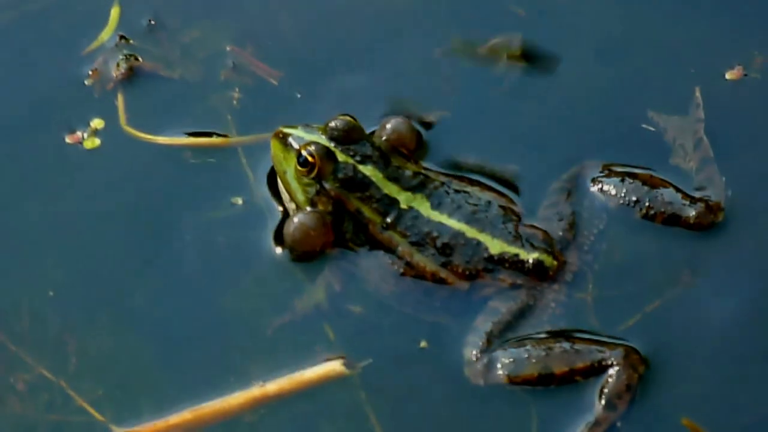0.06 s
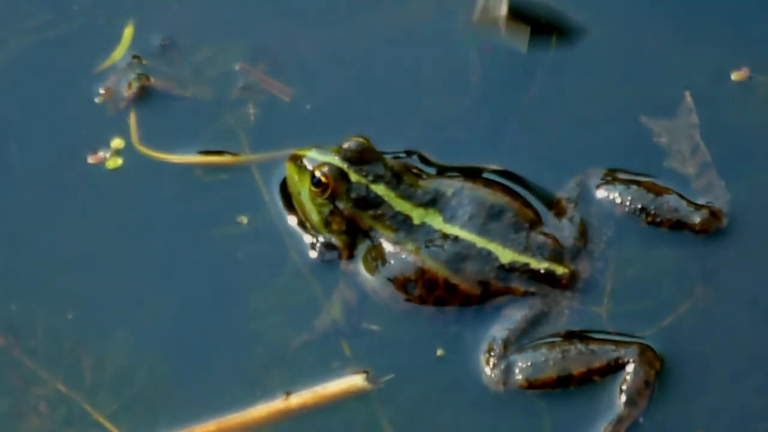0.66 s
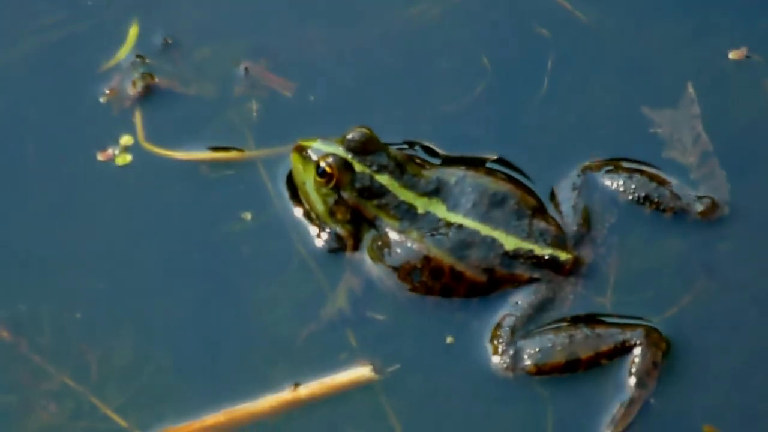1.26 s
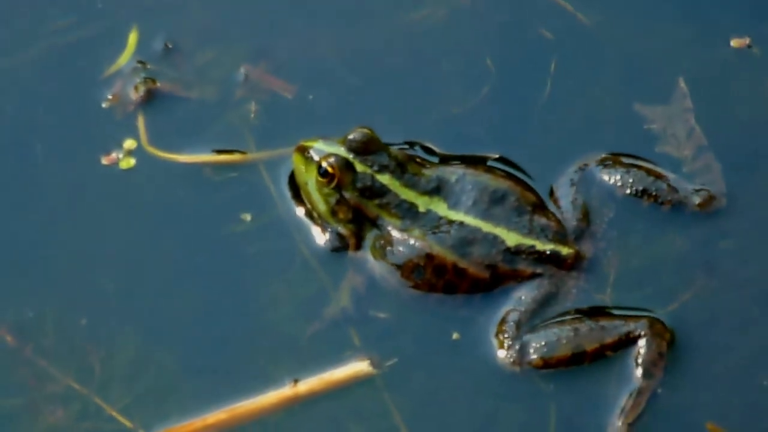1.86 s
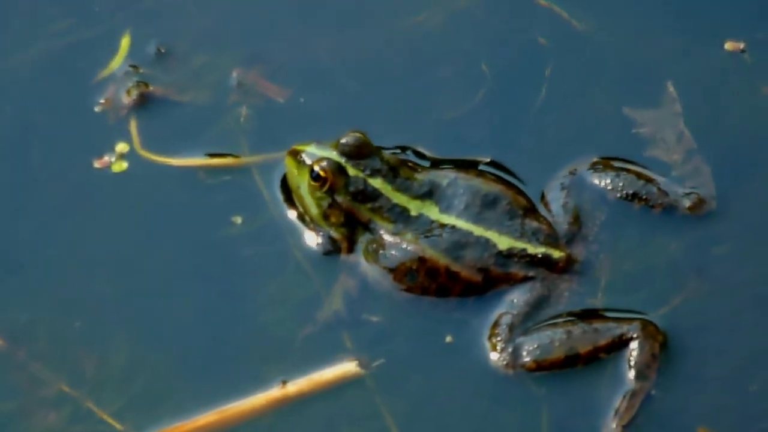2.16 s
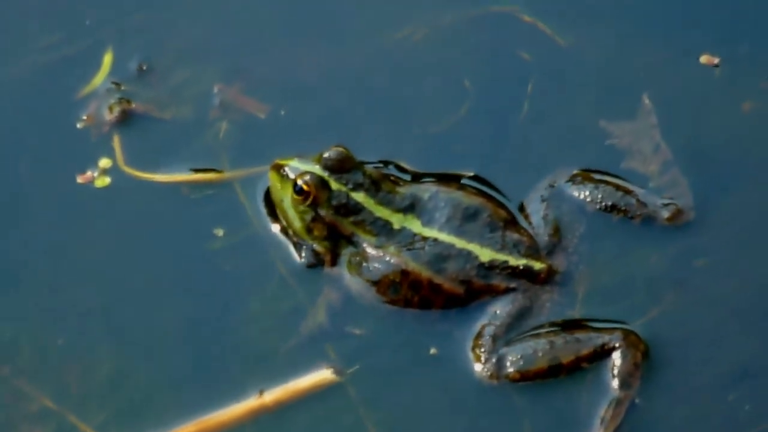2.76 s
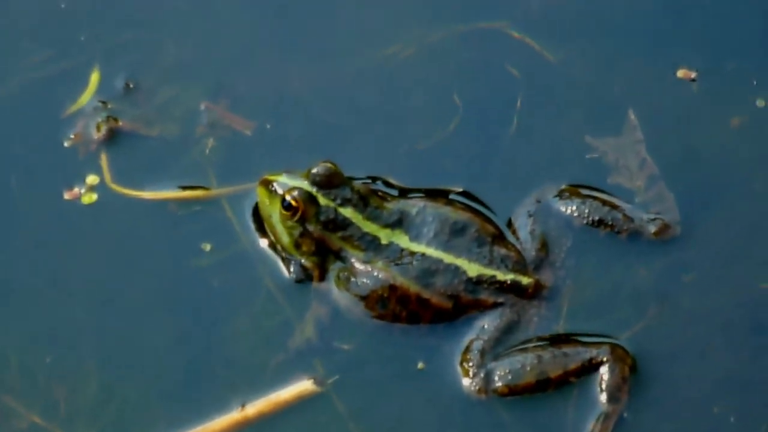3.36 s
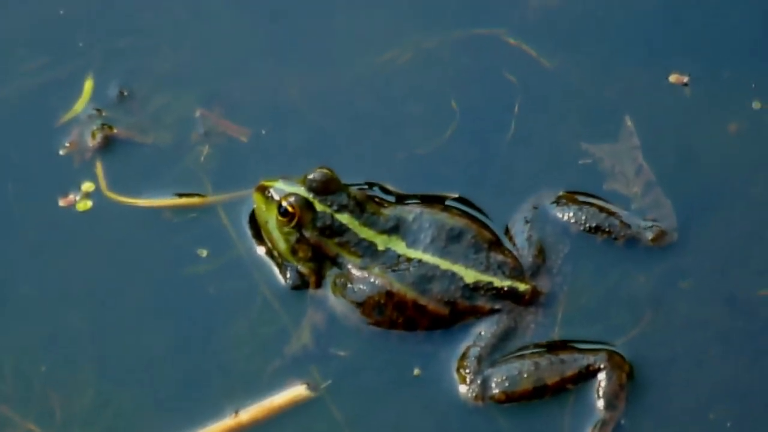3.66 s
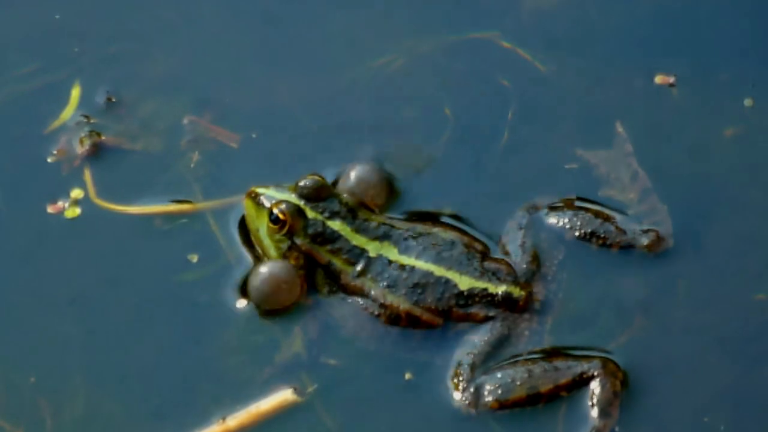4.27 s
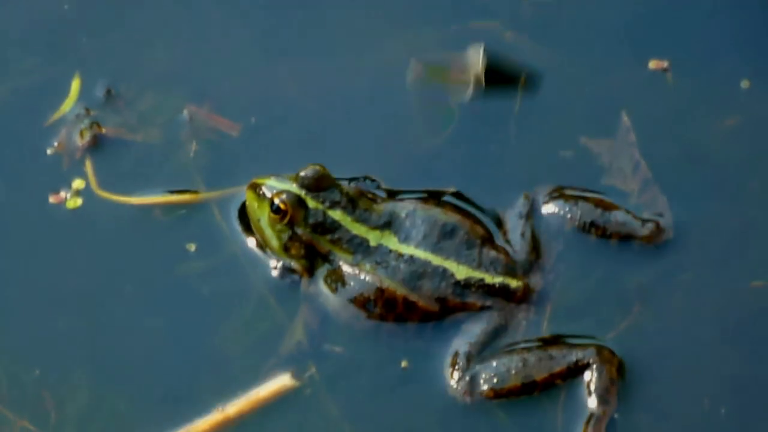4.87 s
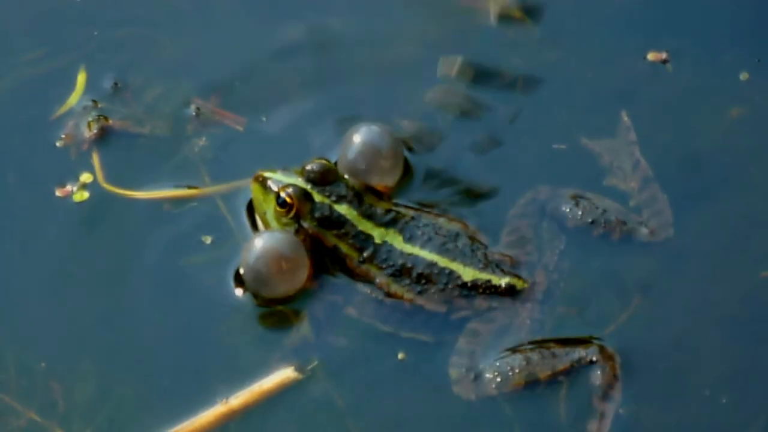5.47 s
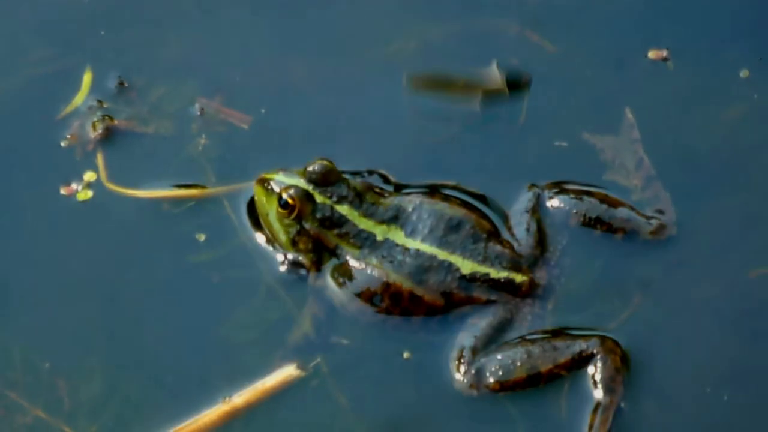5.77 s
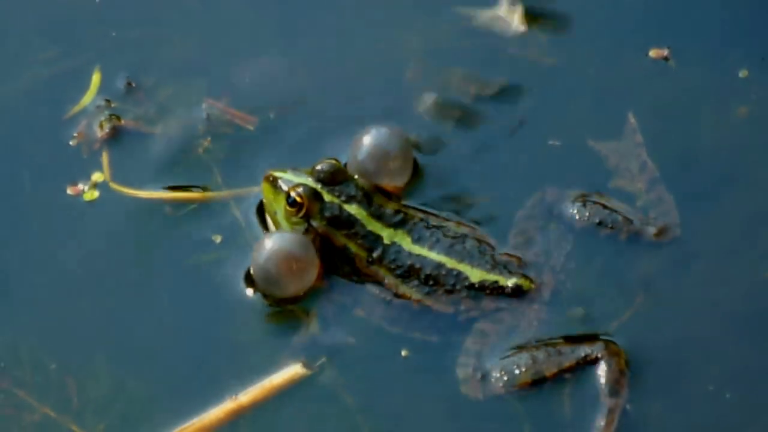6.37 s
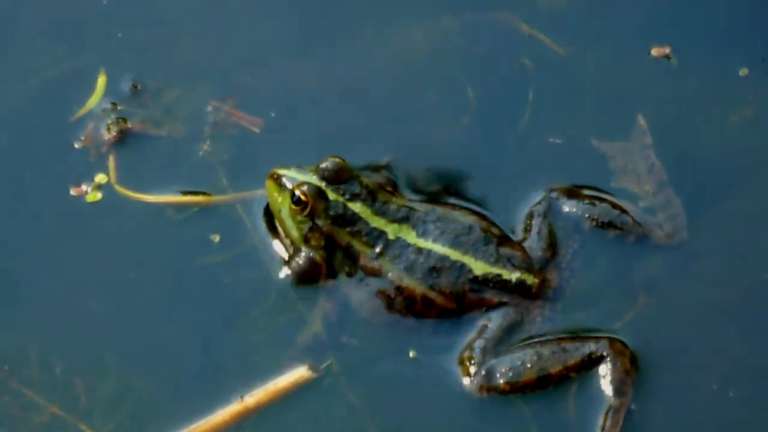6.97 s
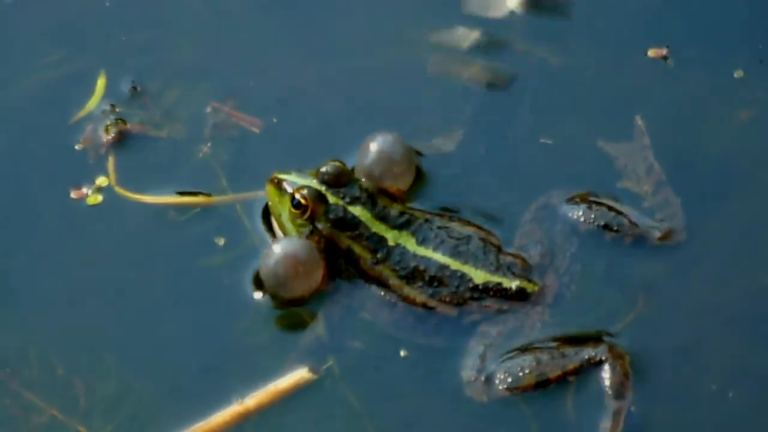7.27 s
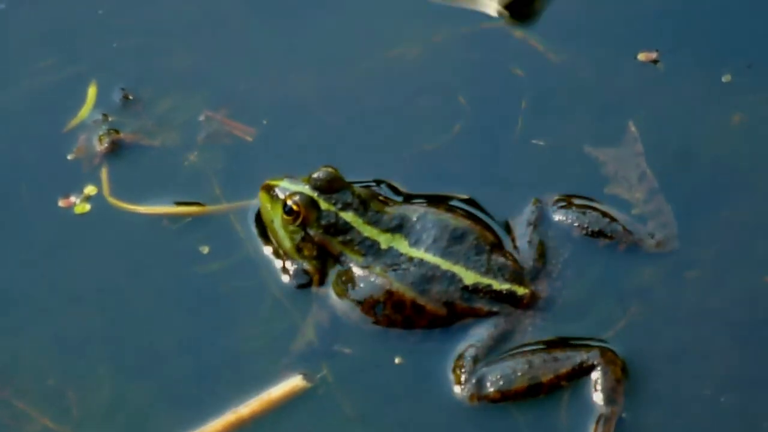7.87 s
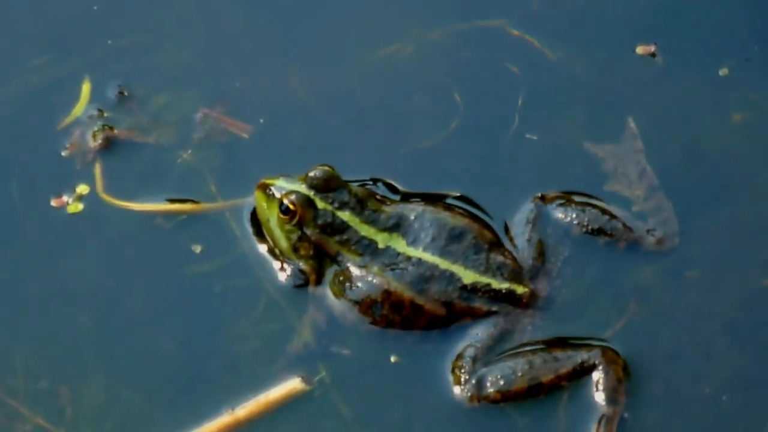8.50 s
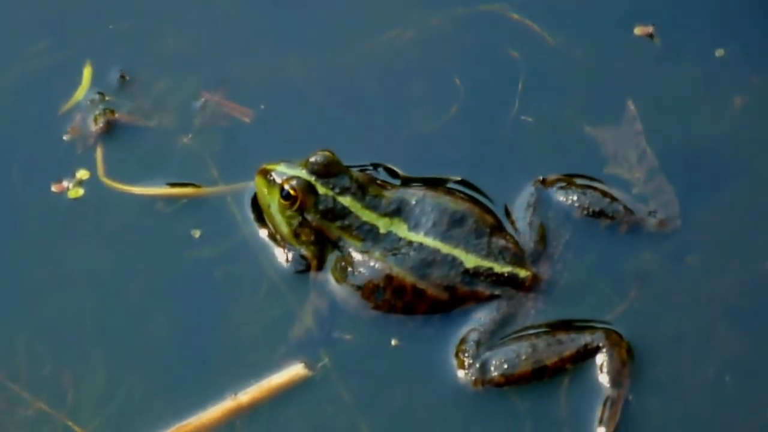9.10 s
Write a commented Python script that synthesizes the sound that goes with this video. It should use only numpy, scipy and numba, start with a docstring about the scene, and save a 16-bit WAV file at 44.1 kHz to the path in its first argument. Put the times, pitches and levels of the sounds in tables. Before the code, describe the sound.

Low grunts open a busy exchange of frog croaks at a pond. A clear frog and a raspy one take turns in fast pulsing bursts that rise and then droop, joined by softer distant frogs, rough grunting and a few low groans. A faint bird whistles once early and twice near the end. The calls are heard from nearby, leaning a little left, with light echoes and quiet open air behind.

```python
"""Water frogs call around a still pond: a clear-voiced one, a buzzy one to the left and a few further
off trade runs of ten notes a second that rise as the sacs fill and droop as the frog tires, some closing
on a slack groan; another grunts low in bouts. Each note is a train of larynx pulses ringing throat and
vocal sacs. The banks echo them, a bird slurs three whistles, and the air murmurs faintly."""
import sys
import numpy as np
from scipy import signal
from scipy.fft import rfft, irfft, next_fast_len
from scipy.io import wavfile
from scipy.ndimage import uniform_filter1d
from numba import njit

SR = 44100
rng = np.random.default_rng(int(sys.argv[2]) if len(sys.argv) > 2 else 0)


def master(y):
    """Save y as 16-bit WAV."""
    cut = np.clip(np.atleast_2d(y).T, -1, 1)
    pcm = np.round(cut * 32767)  # scale
    wavfile.write(sys.argv[1], SR, pcm.astype(np.int16))


N = 403074
SPAN = 8192  # samples in one note's buffer
T = np.arange(SPAN) / SR
F = np.fft.rfftfreq(SPAN, 1 / SR) + 1e-3

# Runs of notes: start_s, first_gap_s, notes, first_level_db, full_level_db, last_level_db,
# first_sac_hz, full_sac_hz, last_sac_hz, treble_vs_level_db
CLEAR_RUNS = [(.532, 0.095, 6, -21, -18.5, -24, 1456, 1993, 1800, -8.5),
              (2.027, .095, 5, -19, -18, -21, 1503, 1900, 1810, -9),
              (3.994, .0955, 5, -19, -17, -24, 1504, 1930, 1920, -8.5),
              (5.846, 0.095, 6, -21.5, -18, -27.5, 1496, 2004, 1800, -8),
              (7.258, .097, 6, -21, -19.5, -20, 1640, 2004, 2105, -9),
              (8.511, .0955, 7, -17.2, -17.3, -18.3, 1850, 2234, 2100, -10)]
BUZZY_RUNS = [(-.028, 0.059, 2, -21.5, -29.5, -29.5, 1800, 1800, 1690, -3),
              (.681, .0998, 7, -22.5, -23.5, -24, 1790, 2250, 2080, -1),
              (2.803, .1001, 7, -21, -21, -22.5, 1760, 1867, 1680, -5.5),
              (4.757, .1004, 6, -20.5, -21.5, -22, 1720, 1830, 1890, -5.5),
              (6.017, .1007, 7, -20.5, -23.5, -23, 2050, 2070, 1927, -2.5)]
FAR_RUNS = [(2.652, .102, 5, -26.5, -24, -26, 2076, 2130, 2070, -12),
            (5.504, 0.1, 4, -31, -24.5, -28.5, 2070, 1900, 1730, -17.5),
            (6.807, .095, 2, -47, -51, -47, 1690, 1850, 1930, -23),
            (8.053, 0.083, 4, -46, -43, -48.5, 1750, 1780, 1620, -12)]
# Slack groans: start_s, level_db, sac_hz, treble_vs_level_db
GROANS = [(1.362, -23, 1620, -9), (2.526, -25, 1720, -16), (3.474, -31, 1600, -17),
          (7.851, -24.5, 1760, -16)]
# Bouts of grunts: start_s, first_gap_s, grunts, length_s, nominal_pulse_hz, roughness (0-1), level_db,
# grunts_until_full, throat_hz, boom_db, treble_vs_level_db
GRUNT_BOUTS = [(0.038, .053, 6, .028, 95, .7, -31, 0, 1000, -29.5, -23),
               (1.668, 0, 1, .083, 390, .1, -32.5, 0, 1200, -43.5, -25),
               (1.76, 0, 1, .08, 385, .6, -33, -1.5, 760, -39, -18),
               (1.833, .035, 4, .042, 338.4, .65, -22.3, .9, 1000, -37.5, -28),
               (2.927, .11, 2, 0.075, 384, 0.65, -22, 2.2, 1075, -30.5, -28),
               (4.273, 0.049, 6, 0.033, 395, 0.53, -20, 2, 1435, -25.5, -11.5),
               (5.254, .0485, 5, 0.0314, 399.5, .55, -18.5, 2, 1390, -25.5, -8.5),
               (6.164, 0.05, 5, 0.029, 403.6, .65, -19, 2.5, 1425, -26, -12.5),
               (6.969, 0.041, 6, .038, 348, .85, -19.8, 3.5, 1150, -25, -17)]
# Body resonances, below the vocal sac's: centre_hz, width_hz, gain_db
CLEAR_BODY = [(400, 71, -20.5), (1000, 530, -14.5), (1420, 340, -11)]
BUZZY_BODY = [(403, 480, -26), (1026, 485, -12.5), (1204, 400, -10.5)]
FAR_BODY = [(530, 160, -20.5), (910, 240, -15)]
GROAN_BODY = [(416, 85, -13), (880, 250, -10), (1320, 260, -9)]
# Treble resonances that give each voice its edge: centre_hz, width_hz, gain_db
CLEAR_TREBLE = [(2664, 840, 2.5), (3258, 460, -3.5), (3874, 465, 4), (5100, 450, -9.5)]
BUZZY_TREBLE = [(2823, 200, 3.5), (3060, 440, 4.5), (4205, 400, 8), (5660, 490, -18.5)]
FAR_TREBLE = [(2750, 640, -1.6), (3300, 400, -1.1), (4730, 210, 1)]
GRUNT_TREBLE = [(2260, 340, -8), (3770, 420, -0.5)]
# The bird's slurs, one list of points per whistle: time_s, pitch_hz, level_db
WHISTLES = [
    [(1.675, 3470, -58), (1.69, 3270, -42), (1.715, 2980, -54), (1.745, 3340, -37), (1.77, 3680, -54),
     (1.815, 3700, -62.5), (1.838, 3370, -32), (1.86, 2990, -33), (1.915, 3060, -67.5)],
    [(7.07, 4880, -58), (7.085, 4860, -47), (7.125, 4580, -55), (7.17, 3970, -55)],
    [(8.01, 4240, -49), (8.032, 4730, -41.5), (8.075, 3310, -48), (8.1, 3410, -42), (8.13, 2990, -47),
     (8.16, 2400, -73)],
]
# Tone colour of the air bed: frequency_hz, relative_density_db
AIR_COLOUR = [(26, -64.5), (45, -37), (120, -20), (160, -20.5), (219, -8), (301, -9.5), (440, -2),
              (579, -3.5), (865, -10), (1160, -6.5), (1380, -10), (1700, -10), (2490, -14), (3410, -14),
              (4490, -16.5), (7000, -27.5), (9100, -63.5), (15400, -120)]
# Fader ride on the air's bass, taken about its mean: time_s, level_db
BASS_RIDE = [(0.0, -72), (1.39, -72), (1.75, -68.5), (4.91, -69), (6.54, -74), (7.12, -70), (9.1, -74.5)]

RISE_S, NOTE_S = .015, .04  # a croak's attack; the nominal length its level refers to


def clear_frog():
    """The lead voice: evenly timed pulses give a clean, pitched croak."""
    return croaks(run_notes(CLEAR_RUNS, slowing_s=.003, dull_db=4), CLEAR_BODY, CLEAR_TREBLE,
                  swell(RISE_S, .026, .024), start_hz=536.2, sag_s=.078, bend=1.6,
                  sac_width_hz=167, sac_sag=.32, jitter=.013, fray=2.46, bite_s=.066)


def buzzy_frog():
    """The answering voice: slower, more ragged pulses make it buzz."""
    return croaks(run_notes(BUZZY_RUNS, slowing_s=0, dull_db=8.1), BUZZY_BODY, BUZZY_TREBLE,
                  swell(RISE_S, .013, .022), start_hz=447, sag_s=.07, bend=1.4,
                  sac_width_hz=151, sac_sag=2.4, jitter=.03, fray=.7, bite_s=.15)


def far_frogs():
    """Softer, duller voices further off: each push of air holds, then stops short."""
    return croaks(run_notes(FAR_RUNS, slowing_s=.003, dull_db=1.5), FAR_BODY, FAR_TREBLE,
                  swell(RISE_S, .037, .01), start_hz=500.6, sag_s=.089, bend=1.4,
                  sac_width_hz=162, sac_sag=.61, jitter=.013, fray=2.7, bite_s=.11)


def groans():
    """Low, slack notes that close some runs, their pulse rate sagging only gently."""
    return croaks(GROANS, GROAN_BODY, CLEAR_TREBLE,
                  swell(RISE_S, .026, .028), start_hz=440, sag_s=.22, bend=1.3,
                  sac_width_hz=170, sac_sag=1.2, jitter=.03, fray=1.5, bite_s=.1)


def run_notes(runs, slowing_s, dull_db, fill_notes=.94, tire_power=3.5):
    """Phrasing of a run: notes rise and brighten as the sacs fill, then droop as the frog tires."""
    for start_s, gap_s, count, first_db, full_db, last_db, first_hz, full_hz, last_hz, treble_db in runs:
        count = round(count)
        for k in range(count):
            empty = np.exp(-k / fill_notes)
            tired = (k / (count - 1)) ** tire_power
            yield (start_s + k * gap_s + slowing_s * k * (k - 1) / 2,
                   full_db + (last_db - full_db) * tired if k else first_db,
                   full_hz + (first_hz - full_hz) * empty + (last_hz - full_hz) * tired,
                   treble_db - dull_db * empty)


def croaks(notes, body_modes, treble_modes, push, start_hz, sag_s, bend,
           sac_width_hz, sac_sag, jitter, fray, bite_s):
    """Pulses ring sacs and throat; their rate holds, then drops and frays as the pressure runs out."""
    out = np.zeros(N)
    spent_s = np.minimum(T, .055)  # the sag bottoms out here
    for start_s, level_db, sac_hz, treble_db in notes:
        onset_hz = start_hz * (1 + .02 * rng.standard_normal())
        pulse_hz = onset_hz * np.exp(-(spent_s / sag_s) ** bend * rng.uniform(.75, 1.25))
        force = undb((treble_db + 11) * .7)  # brighter notes are rougher
        pulses = larynx(pulse_hz, push, jitter * force, shimmer_db=1.5, rasp=.1 * force, fray=fray)
        sac = vocal_sac(pulses, sac_hz * np.exp(-sac_sag * (spent_s - .028)), float(sac_width_hz))
        taut_db = .012 * max(sac_hz - 1900, 0)  # on taut sacs the lower resonances recede
        body = ring(pulses, body_modes) * undb(-taut_db) - sac
        body = cut(cut(body, 2597, "low", order=7), 340, "high", order=4)
        stretch = 1 + .012 * rng.standard_normal()  # the throat is never held quite the same
        throat_modes = [(stretch * hz, width_hz, db) for hz, width_hz, db in treble_modes]
        bite = pulses * np.exp(-T / bite_s)  # the treble leans on the attack
        treble = cut(ring(bite, throat_modes, order=2), 5670, "low", order=4)
        add(out, start_s, level(body, level_db, NOTE_S) + level(treble, level_db + treble_db, NOTE_S))
    return out


def swell(rise_s, hold_s, fall_s):
    """The push of air: it builds, holds, then dies away."""
    attack = np.sin(np.pi / 2 * np.minimum(T / rise_s, 1)) ** 2
    return attack * np.exp(-(np.maximum(T - hold_s, 0) / fall_s) ** 2)


def larynx(hz, push, jitter, shimmer_db, rasp, fray=0):
    """One pulse and a puff of turbulent air per cycle, the pulses uneven in time and size."""
    cycles = np.cumsum(hz) / SR
    index = np.arange(64)
    chance = rng.standard_normal((64, 2))
    late = np.minimum(np.interp(index, cycles, T) / NOTE_S, 1)
    slip_cycles = jitter * (1 + fray * late ** 2) * chance[:, 0]  # fray loosens the note's tail
    pulse_s = np.interp(index + .3135 + slip_cycles, cycles, T)
    size = np.interp(pulse_s, T, push) * undb(shimmer_db * chance[:, 1])
    taps = (pulse_s * SR).astype(int)[:, None] + np.arange(-4, 5)
    clicks = size[:, None] * np.sinc(taps - pulse_s[:, None] * SR)  # placed between samples
    pulses = np.zeros(SPAN)
    np.add.at(pulses, np.clip(taps, 0, SPAN - 1), clicks)
    breath = rng.standard_normal(SPAN) * push * np.exp(-((cycles - .3) % 1) / .57)
    return pulses / np.std(pulses) + rasp * breath / np.std(breath)


@njit
def vocal_sac(x, hz, width_hz):
    """The sac's ring: a band-pass whose centre glides from sample to sample."""
    out, band_state, low_state = np.empty(len(x)), 0., 0.
    for i in range(len(x)):
        tuning, damping = np.tan(np.pi * hz[i] / SR), width_hz / hz[i]
        band = (band_state + tuning * (x[i] - low_state)) / (1 + tuning * (tuning + damping))
        band_state = 2 * band - band_state
        low_state += 2 * tuning * band
        out[i] = damping * band
    return out


def ring(x, modes, order=1):
    """Fixed resonances: order 1 alternates signs for shallow valleys, order 2 has steep skirts."""
    response = sum((-1) ** (k * order) * undb(db) / (1 + 1j * (F * F - hz * hz) / (F * width)) ** order
                   for k, (hz, width, db) in enumerate(modes))
    return irfft(rfft(x) * response)


def grunting_frog():
    """Slack pulses, uneven in time and size, boom in the swollen sacs and ring the throat."""
    out = np.zeros(N)
    for start_s, length_s, rate_hz, rough, throat_db, throat_hz, boom_db, treble_db in grunt_notes():
        droop = .9 + .22 * np.exp(-2 * T / length_s)
        pulse_hz = rate_hz * droop * (1 + .06 * rough * rng.standard_normal())
        push = swell(.14 * length_s, .54 * length_s, .54 * length_s)
        pulses = larynx(pulse_hz, push, jitter=.2105 * rough, shimmer_db=4.6 * rough, rasp=.4 * rough)
        modes = [(.56 * throat_hz, 240, -9), (.921 * throat_hz, 230, 0), (1.049 * throat_hz, 300, -4)]
        throat = ring(pulses, modes, order=2)
        boom = cut(ring(pulses, [(397.6, 147, 0)], order=2), 370, "high", order=4)
        treble = cut(ring(pulses, GRUNT_TREBLE, order=2), 5200, "low", order=4)
        add(out, start_s, level(throat, throat_db, length_s) + level(boom, boom_db, length_s)
            + level(treble, throat_db + treble_db, length_s))
    return out


def grunt_notes(slowing_s=.005):
    """Phrasing of a bout: slack sacs open on a soft boom, then the grunts harden and slow."""
    for (start_s, gap_s, count, length_s, rate_hz, rough, level_db,
         until_full, throat_hz, boom_db, treble_db) in GRUNT_BOUTS:
        for k in range(round(count)):
            slack = max(until_full - k, 0) ** 2  # longer, smoother, softer and lower
            spent_db = 3 * max(k - 4, 0)  # the air runs short after five grunts
            yield (start_s + k * gap_s + slowing_s * k * (k - 1) / 2,
                   length_s * (1 + .051 * slack), rate_hz, rough * np.exp(-.07 * slack),
                   level_db - 2.7 * slack - spent_db, throat_hz * np.exp(-.037 * slack),
                   boom_db - .7 * slack - spent_db, treble_db)


def bird():
    """Slurred whistles: a pure tone that glides and wavers slightly."""
    out = np.zeros(N)
    for points in WHISTLES:
        time_s, pitch_hz, level_db = np.transpose(points)
        t = np.arange(time_s[0], time_s[-1], 1 / SR)
        waver = 1 + .22 * uniform_filter1d(rng.standard_normal(len(t)), 80)
        slur_hz = uniform_filter1d(np.interp(t, time_s, pitch_hz), 400) * waver
        envelope = np.sqrt(2) * undb(np.interp(t, time_s, level_db))
        add(out, time_s[0], envelope * np.sin(2 * np.pi * np.cumsum(slur_hz) / SR))
    return out


def pond(dry, pan_db, lag_ms, bank_db, tail_db, t60_s=.34):
    """A call heard across the water: a few echoes from the banks, then a soft tail from the garden."""
    t = np.arange(SR) / SR
    echoes = []
    for _ in range(2):
        bank = np.zeros(SR)
        delays_s = rng.uniform(.011, .045, size=9)
        bank[(delays_s * SR).astype(int)] = rng.choice([-1, 1], size=9) * np.exp(-delays_s / .016)
        wash = cut(rng.standard_normal(SR), 7500, "low", order=1)
        tail = wash * np.minimum(t / .086, 1) * undb(-60 * t / t60_s)
        room = undb(bank_db) * bank / np.linalg.norm(bank) + undb(tail_db) * tail / np.linalg.norm(tail)
        echoes.append(signal.fftconvolve(dry, room)[:N])
    return microphones(dry, echoes, 520, pan_db, lag_ms)


def air(level_db=-45, flicker_db=2.0):
    """Distant outdoor murmur: octaves of noise that each waver a little; the bass swells slowly."""
    f = np.fft.rfftfreq(N, 1 / SR) + 1
    colour_hz, colour_db = np.transpose(AIR_COLOUR)
    colour = undb(np.interp(np.log(f), np.log(colour_hz), colour_db))
    spectra = rfft(rng.standard_normal((2, N))) * colour
    octave = np.floor(np.log2(np.clip(f, 64, 8000)))
    ride_s, ride_db = np.transpose(BASS_RIDE)
    swell_db = np.interp(np.arange(N) / SR, ride_s, ride_db - ride_db.mean())
    bed = 0
    for band in np.unique(octave):
        waver = np.interp(np.arange(N), np.linspace(0, N, 110), rng.standard_normal(110))
        gain = undb(flicker_db * waver + swell_db * (band < np.log2(256)))
        bed = bed + irfft(spectra * (octave == band), N) * gain
    bed = bed * undb(level_db) / np.std(bed)
    return microphones(np.zeros(N), bed, widen_hz=1800, pan_db=1.7, lag_ms=.015)


def microphones(direct, diffuse, widen_hz, pan_db, lag_ms):
    """Two close capsules: near mono in the bass, the treble wide and leaning left; the left lags."""
    size = next_fast_len(N + SPAN)
    f = np.fft.rfftfreq(size, 1 / SR)
    spread = np.pi / 4 * f / (f + widen_hz)
    shade_db = np.interp(f, [500, 1400, 3000], [-1.4, .66 * pan_db, pan_db])
    mid = rfft(direct, size) + rfft(diffuse[0], size) * np.cos(spread)
    side = rfft(diffuse[1], size) * np.sin(spread)
    left = (mid + side) * undb(shade_db / 2) * np.exp(-2j * np.pi * f * lag_ms / 1000)
    right = (mid - side) * undb(-shade_db / 2)
    return irfft(np.array([left, right]), size)[:, :N]


def undb(db):
    """Decibels to gain."""
    return 10 ** (np.asarray(db) / 20)


def level(x, db, length_s):
    """Trim a short sound so that its energy, spread over length_s, sits at this level."""
    return x * undb(db) / np.sqrt(np.sum(x ** 2) / (length_s * SR) + 1e-18)


def cut(x, hz, kind, order):
    """Butterworth low- or high-pass."""
    return signal.sosfilt(signal.butter(order, min(hz, .45 * SR), kind, fs=SR, output="sos"), x)


def add(track, start_s, sound):
    """Lay a sound into the track at start_s."""
    start = max(int(start_s * SR), 0)
    part = sound[start - int(start_s * SR):][:max(N - start, 0)]
    track[start:start + len(part)] += part


def scene():
    """The mix: every caller at its own place around the pond, over the air bed."""
    clear, buzzy, far = clear_frog(), buzzy_frog(), far_frogs()
    return (pond(clear + groans(), pan_db=2.5, lag_ms=.057, bank_db=-5.5, tail_db=-15.5)
            + pond(buzzy, pan_db=5, lag_ms=.042, bank_db=-5.5, tail_db=-14.5)
            + pond(far, pan_db=2.5, lag_ms=.052, bank_db=-10.5, tail_db=-14.5)
            + pond(grunting_frog(), pan_db=1.3, lag_ms=.053, bank_db=-6, tail_db=-18)
            + pond(bird(), pan_db=7, lag_ms=.01, bank_db=-3.5, tail_db=-9)
            + air())


def record(dry):
    """A quick fade at each end and a steep cut of the high treble."""
    fade_s, top_hz = .003, 7400
    fade = np.minimum(np.minimum(np.arange(N), np.arange(N)[::-1]) / (fade_s * SR), 1)
    return signal.sosfilt(signal.ellip(8, .2, 60, top_hz, fs=SR, output="sos"), dry * fade)


dry = scene()
out = record(dry)
master(out)
```